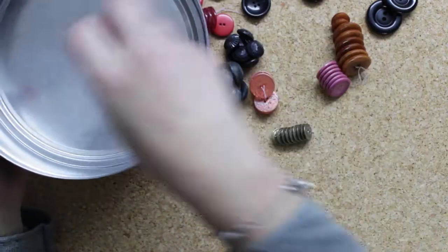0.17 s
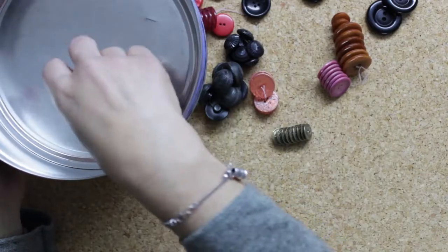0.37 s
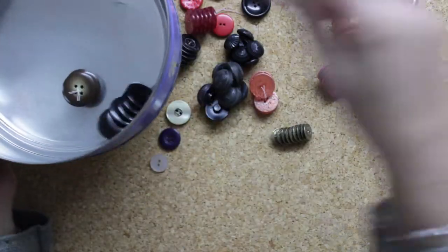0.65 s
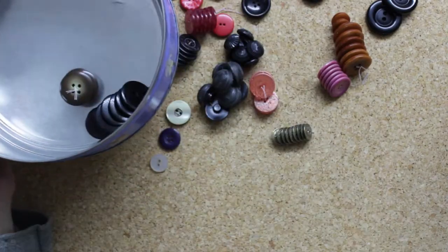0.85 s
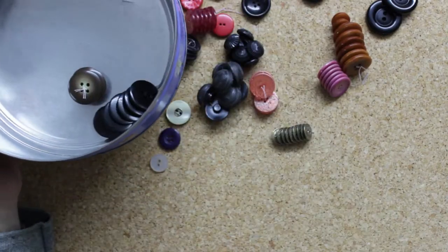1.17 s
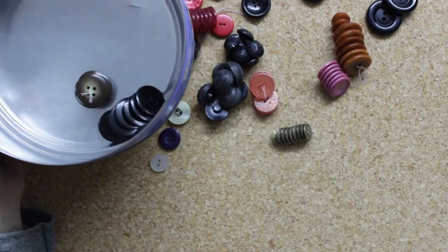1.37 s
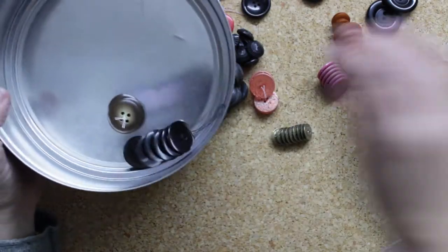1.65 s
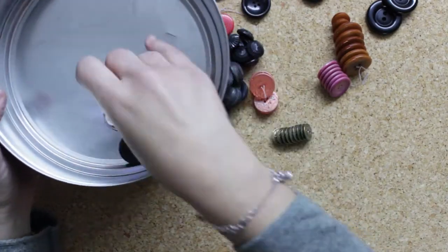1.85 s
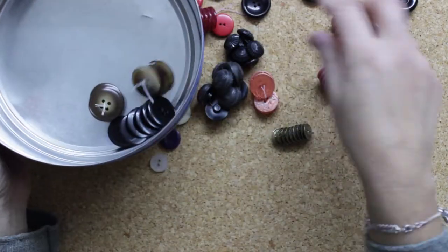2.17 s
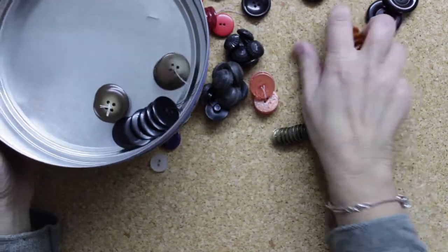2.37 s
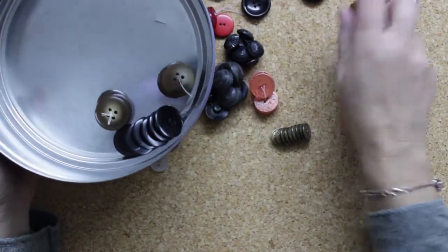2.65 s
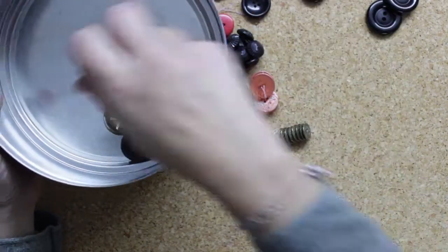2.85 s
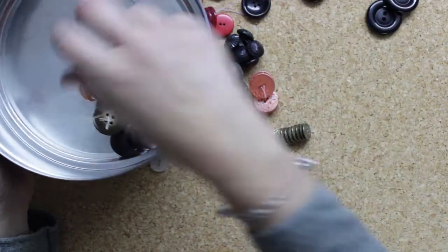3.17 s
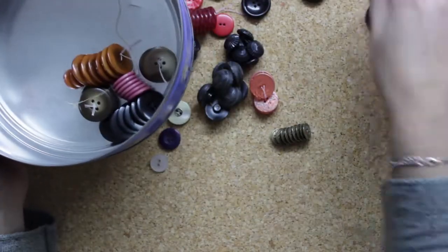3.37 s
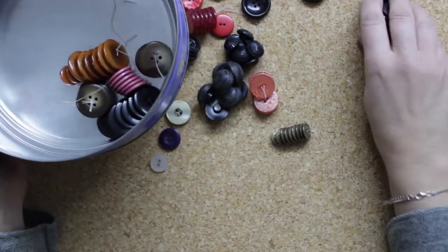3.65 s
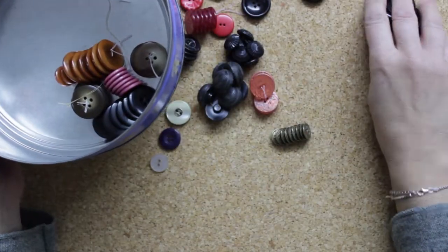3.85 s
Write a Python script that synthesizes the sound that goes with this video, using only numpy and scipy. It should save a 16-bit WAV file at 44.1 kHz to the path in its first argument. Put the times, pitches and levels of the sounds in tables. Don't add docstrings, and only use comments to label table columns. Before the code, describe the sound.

Close up in a small hard room, a hand brushes a cork table, then plastic buttons rattle into a thin metal tin. A quick clatter comes first, then a pause, a single small rattle, another loud burst, ticks and scuffs as more are picked up, and a final very loud crash with a low bump. Soft scuffing and ticks end it over faint hiss.

```python
import sys
import numpy as np
from scipy import signal
from scipy.fft import rfft, irfft
from scipy.io import wavfile
from scipy.ndimage import uniform_filter1d

SR = 44100
rng = np.random.default_rng(int(sys.argv[2]) if len(sys.argv) > 2 else 0)


def dump(signal):
    limited = np.clip(np.atleast_2d(signal).T, -1, 1)
    pcm = np.round(limited * 32767).astype(np.int16)
    wavfile.write(sys.argv[1], SR, pcm)


def makeup_ratio(level_db):
    decades = np.asarray(level_db, float) / 20
    return 10 ** decades


N = 177105

# (start [s], firmest [s], end [s], rub level [dB], scuff level [dB])
STROKES = [(0.0, -0, 0.099, -45.5, -46), (0.077, 0.214, 0.3, -54.5, -42), (0.373, 0.426, 0.46, -47.5, -38),
           (1.268, 1.365, 1.515, -73, -48.5), (1.843, 1.867, 1.78, -39.5, -43),
           (2.382, 2.486, 2.66, -41.5, -36), (2.604, 2.671, 2.766, -57, -44.5),
           (3.554, 3.579, 3.69, -42, -38.5), (3.7, 3.742, 3.77, -57, -43.5),
           (3.76, 3.928, 4.03, -47.5, -45.5)]
# (frequency [Hz], width [Hz], level [dB])
RUB_RESONANCES = [(4870, 800, 8), (6120, 1400, -3), (12500, 5000, -8)]
# (time [s], hold [s], top thud level [dB], frame rumble level [dB])
LEANS = [(0.0, 0.038, -88, -59), (0.495, 0.061, -68, -52), (0.6, 0.14, -70.5, -70),
         (1.377, .02, -73.5, -55.5), (1.913, .02, -66, -80), (2.02, 0.015, -57, -46),
         (2.412, 0.16, -52, -51), (2.695, 0.032, -75, -70.5), (3.25, 0.018, -112, -60),
         (3.6, 0.03, -63, -54), (3.934, 0.098, -53, -50.5)]
# (frequency [Hz], density [dB per Hz])
HUSH_SPECTRUM = [(12, -34), (20, -12), (27, -40), (101, -15.5), (120, -43), (367, -20.5), (485, -13),
                 (527, -17), (2320, -21), (2820, -20.5), (3440, -23), (4180, -23.5), (16000, -30)]
# (time [s], peak level [dB], high-mode level [dB], favoured mode [Hz])
DROPS = [(0.2152, -16.5, -3.5, 1188), (0.2206, -17.5, -13, 737), (0.2326, -19, -25.5, 2030),
         (0.2506, -33, -28.5, 740), (0.3055, -25, -22, 755), (0.376, -35, -9.5, 1110),
         (0.4407, -12, -14, 761), (0.4694, -18.5, -8, 900), (0.4998, -6.5, -13, 1960),
         (0.5174, -1, -5, 515), (0.553, -3.5, -7.5, 1074), (0.5816, -10.5, -24, 742),
         (0.6257, -17.5, -24, 640), (0.7022, -16.5, -10, 1493), (0.733, -18.5, -6, 720),
         (0.744, -9.5, -5.5, 1446), (0.7654, -7, -15, 2002), (0.8185, -17.5, -19, 1365),
         (1.309, -33.5, -31.5, 870), (1.326, -31.5, -16, 1130), (1.6844, -30, -19.5, 600),
         (1.698, -13.5, -15, 2030), (1.7433, -29.5, -29.5, 600), (1.927, -8, -9, 1236),
         (1.9494, -14.5, -28.5, 1150), (1.9908, -16.5, -19, 1870), (2.063, -8, -9.5, 668),
         (2.143, -16.5, -19, 710), (2.165, -8, -12, 3350), (2.3308, -14, -27, 1110)]
# (start [s], length [s], peak level [dB], high-mode level [dB], favoured mode [Hz])
COLLAPSES = [
    (1.88, .005, -7, -11, 1108),
    (2.009, .023, 2.5, -8, 753),
    (2.298, .005, -9.5, -6.5, 778),
    (3.111, .021, 0.5, -7, 626),
    (3.1397, .032, 2.5, -3, 802),
    (3.1824, .02, -6.5, -21, 1254),
    (3.231, .005, -12, -22, 1215),
]
# (frequency [Hz], level [dB], T60 [s])
TIN_MODES = [(553, -7, .1), (590, -7, .1), (750, -1, .12), (843, -6, .1), (986, -8, .1), (1113, -9, .08),
             (1169, -9, .08), (1274, -4, .11), (1372, -9, .09), (1510, -9, .09), (1670, -11, .09),
             (1852, -9, .09), (2030, -7, .12), (2304, -12, .08), (2520, -11, .09), (2972, -12, .08),
             (3280, -14, .1), (3925, -15, .09), (4350, -15, .07), (7200, -24, .06), (8600, -24, .04)]
# (frequency [Hz], level [dB])
SHEET_ENVELOPE = [(250, -61), (420, -18), (750, -12.5), (1500, -7), (3000, -9.5), (6000, -14), (9000, -16),
                  (12000, -24), (16000, -25)]
# (time [s], peak level [dB])
CRACKS = [(0.2164, -15.5), (0.521, -15.5), (0.7053, -14.5), (0.7402, -8), (1.931, -1.5), (2.14, -18),
          (2.165, -11.5), (2.2972, 2.5), (2.3064, -24), (2.3381, -26.5), (2.4284, -26), (3.5568, -19),
          (3.5648, -38)]
# (frequency [Hz], T60 [s])
ROOM_T60 = [(150, 0.16), (500, 0.46), (1500, 0.49), (4000, 0.46), (7000, 0.33), (10000, 0.15), (16000, .11)]
# (time [s], peak level [dB])
BUMPS = [
    (0.439, -33),
    (0.52, -46),
    (1.877, -54),
    (1.926, -42),
    (2.013, -33),
    (2.294, -43),
    (3.112, -21),
    (3.141, -4),
]
# (time [s], peak level [dB], low-mode level [dB], high-mode level [dB], favoured mode [Hz])
TICKS = [(2.429, -16, -4, -9, 4800), (2.4423, -13, 7.5, -13, 629), (2.4715, -21, 8, -7, 1131),
         (2.5038, -14.5, -3, -9, 551), (2.5133, -23, 7.5, -17, 1185), (2.6347, -15.5, -9.5, -37, 1680),
         (2.6485, -27.5, 4.5, -1, 1046), (3.5553, -17, 0, -2, 1580), (3.565, -22, 5, -7, 2910),
         (3.699, -15, 4.5, -49, 1090), (3.725, -27, 10.5, -30, 998), (3.743, -32, 1, -30, 935),
         (3.910, -21, -9, -8, 1200), (3.9208, -30, -6, -20, 770)]
# (time [s], peak level [dB], ring [Hz], T60 [s])
LINKS = [
    (2.447, -46, 14300, 0.087),
    (2.472, -36, 10600, 0.024),
    (2.506, -33.5, 11000, 0.022),
    (2.525, -52, 14300, .06),
    (2.646, -39, 7800, 0.013),
    (3.732, -53, 7600, 0.068),
]


def on_log(table, hz):
    table = np.array(table)
    return np.interp(np.log(np.maximum(hz, 1)), np.log(table[:, 0]), table[:, 1])


def unit(x):
    return x / np.sqrt(np.mean(x ** 2))


def band(x, hz, width):
    return signal.lfilter(*signal.iirpeak(min(hz, .45 * SR), hz / width, fs=SR), x)


def rings(hz, t60, size):
    t = np.arange(size) / SR
    decay = np.exp(-np.log(1000) * t / t60[:, None])
    return np.sin(2 * np.pi * hz[:, None] * t) * decay


def blows(events, hz, db, t60, scatter_db, bounce_db, spot_db, size):
    spots, bounces = 3, 16
    ring = rings(hz, t60, size)
    out = np.zeros(N + 3 * size)
    mode_draws = rng.standard_normal((len(events), spots, len(hz)))
    bounce_times = rng.random((len(events), spots, bounces))
    bounce_forces = rng.standard_normal((len(events), spots, bounces))
    groups = np.digitize(hz, [1200, 5500])
    middle_share = np.clip(np.log(hz / 1200) / np.log(5500 / 1200), 0, 1)
    for event, weights, when, force in zip(events, mode_draws, bounce_times, bounce_forces):
        s, peak_db, low_db, high_db, rattle_s, spot_hz = event
        belly_db = spot_db * np.exp(-(np.log(hz / spot_hz) / .022) ** 2)
        tilt_db = 0.24 * high_db * middle_share
        sign = np.sign(np.roll(weights, 1))
        gain = makeup_ratio(db + belly_db + tilt_db + scatter_db * weights) * sign
        span = int(3 * np.clip(rattle_s, .0005, .03) * SR) + 1
        bounce = makeup_ratio(bounce_db) * force * np.exp(-(1.306 * when) ** 2)
        places = (when * span).astype(int)
        trains = np.array([np.bincount(places[k], bounce[k], span) for k in range(spots)])
        trains[0, 0] += 1
        start = int(s * SR)
        for group, group_db in enumerate((low_db, 0, high_db)):
            members = groups == group
            response = gain[:, members] @ ring[members]
            part = signal.fftconvolve(trains, response, axes=1).sum(0)
            top = np.sqrt(2 * uniform_filter1d(part ** 2, size=180).max())
            out[start:start + len(part)] += makeup_ratio(peak_db + group_db) * part / top
    return out[:N]


def knocks(events, hz, width, trim_db):
    pulses = np.zeros(N)
    for s, db in events:
        pulses[int(s * SR)] += makeup_ratio(db + trim_db) * SR / width
    return band(band(pulses, hz, width), hz, width)


def hand():
    t = np.arange(N) / SR
    out = np.zeros(N)
    grain = makeup_ratio(1.7 * unit(uniform_filter1d(rng.standard_normal(N), size=200)))
    rub = unit(sum(makeup_ratio(db) * band(grain * rng.standard_normal(N), hz, width)
                   for hz, width, db in RUB_RESONANCES))
    scuff = unit(band(band(grain * rng.standard_normal(N), 690.0, 1500.0), 900., 1300.0))
    edge_db = -12.5
    for start, firm, end, rub_db, scuff_db in STROKES:
        times = [start - .02, start, firm, end, end + .05]
        pressure = makeup_ratio(np.interp(t, times, [-80, edge_db, 0, edge_db, -80]))
        out += pressure * (makeup_ratio(rub_db) * rub + makeup_ratio(scuff_db) * scuff)
    return out


def table():
    t = np.arange(N) / SR
    s, hold, thud_db, rumble_db = np.transpose(LEANS)[:, :, None]
    thud = unit(band(band(rng.standard_normal(N), 100.0, 29.0), 112., 47.0))
    rumble = unit(band(band(rng.standard_normal(N), 230.0, 180.0), 250., 250.))
    rise_db_s, fall_db_s = 153, 112
    lean_db = -rise_db_s * np.maximum(s - t, 0) - fall_db_s * np.maximum(t - s - hold, 0)
    rest = makeup_ratio(-83)
    thud_gain = rest + makeup_ratio(lean_db + thud_db).sum(0)
    rumble_gain = rest + makeup_ratio(lean_db + rumble_db).sum(0)
    return thud_gain * thud + rumble_gain * rumble


def hush():
    shape = makeup_ratio(on_log(HUSH_SPECTRUM, np.fft.rfftfreq(N, 1 / SR)))
    return makeup_ratio(-57.5) * unit(irfft(rfft(rng.standard_normal(N)) * shape, N))


def landings():
    rows = list(DROPS)
    gap_s, sag_db_s, dull_db_s = .0093, -120, -200
    for start, length, peak_db, high_db, hz in COLLAPSES:
        t = np.arange(0, length, gap_s)
        level_draw, time_draw, mode_draw = rng.standard_normal((20, 3))[:len(t)].T
        later = t > 0
        times = start + t + .0015 * time_draw * later
        db = peak_db + sag_db_s * t - 0.5 * level_draw * later
        rows += zip(times, db, high_db + dull_db_s * t, hz * (1 + 0.013 * mode_draw))
        rows.append((start - .007, peak_db - 6, high_db, hz))
    rim_hz, rattle_s = 876, .0088
    events = []
    for s, db, high_db, hz in rows:
        low_db = 2.5 - 13.5 * max(np.log2(hz / rim_hz), 0)
        events.append((s, db, low_db, high_db, rattle_s, hz))
    return events


def tin():
    hz, db, t60 = np.transpose(TIN_MODES)
    small = 300 + 15700 * ((np.arange(500) + rng.random(500)) / 500) ** 1.5
    small_t60 = 0.076 * (small / 1000) ** -0.34
    all_hz = np.r_[hz, small]
    all_db = np.r_[db + 2.5, on_log(SHEET_ENVELOPE, small)]
    all_t60 = np.r_[t60, small_t60]
    return makeup_ratio(-5.5) * blows(landings(), all_hz, all_db, all_t60,
                             scatter_db=3.0, bounce_db=-9.5, spot_db=12.0, size=4000)


def cracks():
    return knocks(CRACKS, 12000.0, 7900.0, trim_db=-10.0)


def room(x):
    t = np.arange(30000) / SR
    tail = 0
    for hz in 150 * 2 ** np.arange(0, 6.9, 1 / 3):
        noise = band(band(rng.standard_normal(len(t)), hz, hz / 3), hz, hz / 2)
        tail = tail + noise * np.exp(-np.log(1000) * t / on_log(ROOM_T60, hz))
    gap_s = 0.0016
    tail = rfft(tail * np.clip(t / gap_s - 1, 0, 1))
    tail = irfft(tail / np.sqrt(uniform_filter1d(abs(tail) ** 2, size=45)), len(t))[:24000]
    return makeup_ratio(-7.5) * signal.fftconvolve(x, tail / np.sqrt(np.sum(tail ** 2)))[:N]


def bumps():
    return knocks(BUMPS, 150., 88.0, trim_db=-13.5)


def buttons():
    hz = 350 * 2 ** (5.5 * (np.arange(60) + rng.random(60)) / 60)
    db = on_log(SHEET_ENVELOPE, hz) - 3 * np.log2(hz / 1000)
    t60 = 0.025 * (hz / 1000) ** -.4
    rattle_s = .0025
    events = [(s, peak_db, low_db, high_db, rattle_s, spot_hz)
              for s, peak_db, low_db, high_db, spot_hz in TICKS]
    return makeup_ratio(-12.0) * blows(events, hz, db, t60,
                              scatter_db=-2.5, bounce_db=-14.5, spot_db=20.0, size=2500)


def bracelet():
    out = np.zeros(N)
    for s, db, hz, t60 in LINKS:
        start = int(s * SR)
        pair = rings(hz * np.array([1, 1.013]), np.array([t60, 0.7 * t60]), size=4000)
        out[start:start + 4000] += makeup_ratio(db) * pair.sum(0)
    return out


def scene():
    no_bass = signal.butter(5, 340., "high", fs=SR, output="sos")
    struck = signal.sosfilt(no_bass, tin() + buttons()) + cracks()
    near = hand() + table() + bumps() + bracelet()
    return (struck + room(struck) + near + hush())[None]


def roll_off(x):
    return signal.sosfilt(signal.butter(12, 16250, fs=SR, output="sos"), x)


def record(dry):
    clipped = np.clip(dry, -1.02, .98)
    low_pass = signal.ellip(8, .2, 50, 15850, fs=SR, output="sos")
    cut = signal.sosfilt(low_pass, clipped)
    mix = np.clip(cut, -1, 1) + .001
    return roll_off(mix)


dry = scene()
out = record(dry)
dump(out)
```